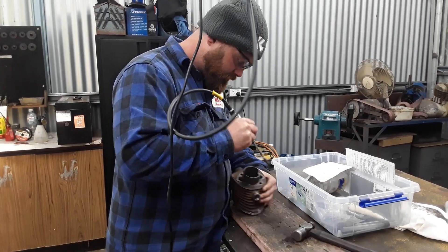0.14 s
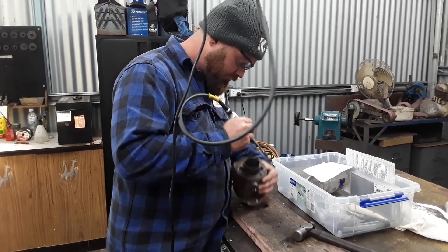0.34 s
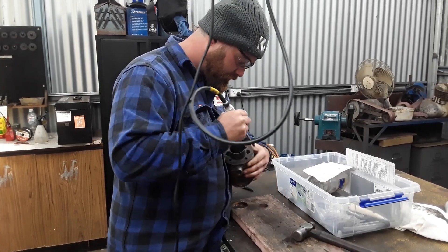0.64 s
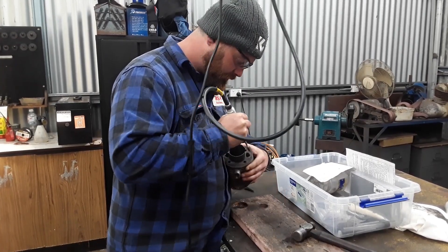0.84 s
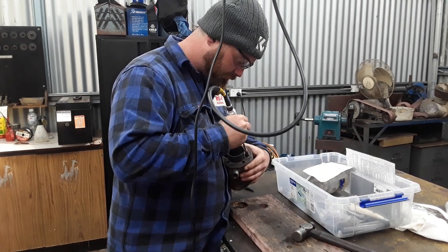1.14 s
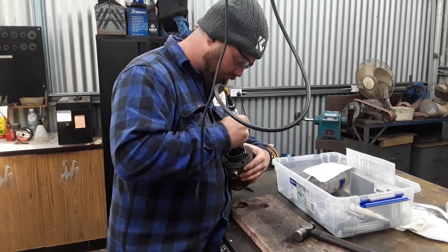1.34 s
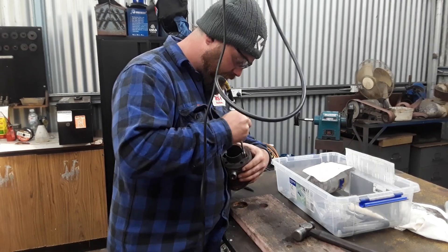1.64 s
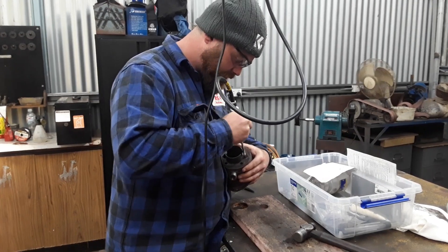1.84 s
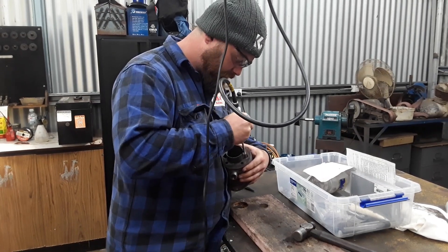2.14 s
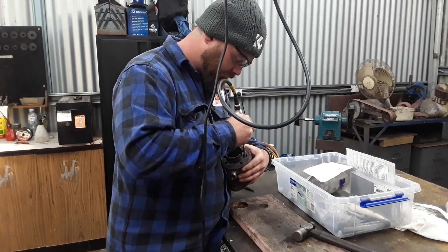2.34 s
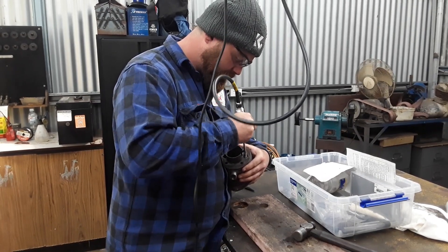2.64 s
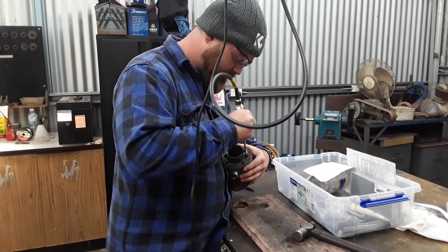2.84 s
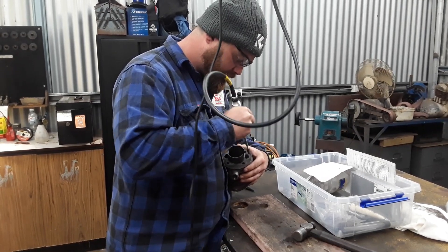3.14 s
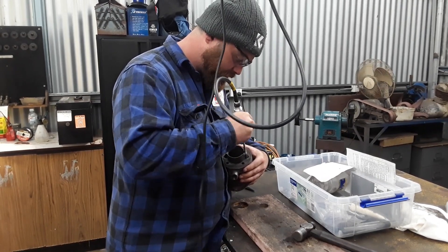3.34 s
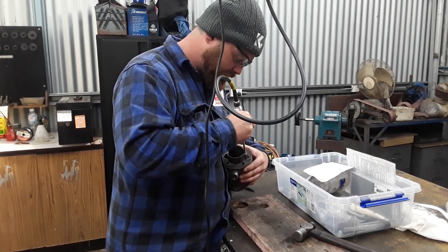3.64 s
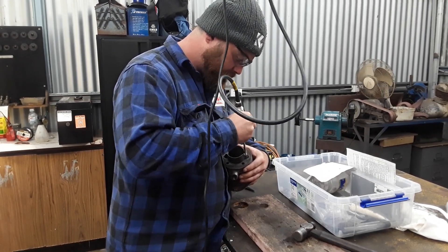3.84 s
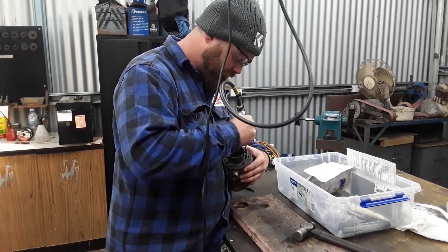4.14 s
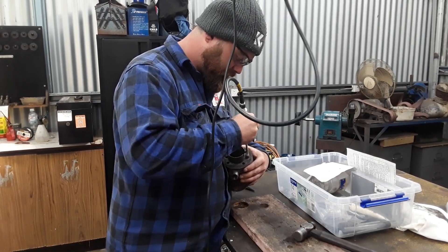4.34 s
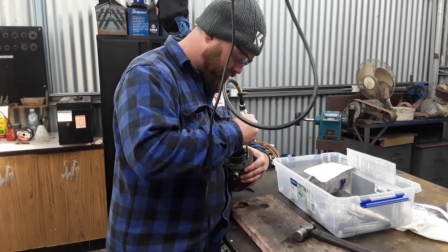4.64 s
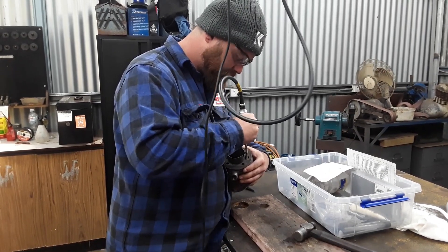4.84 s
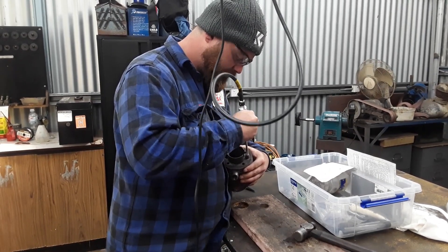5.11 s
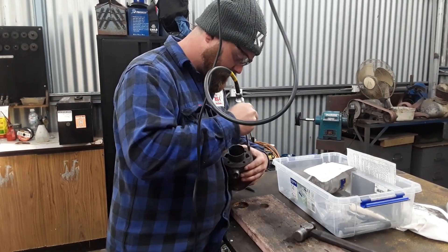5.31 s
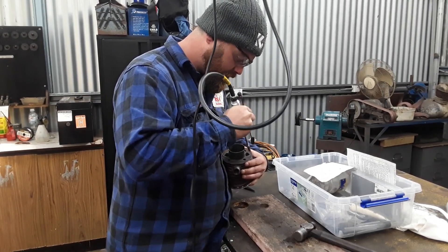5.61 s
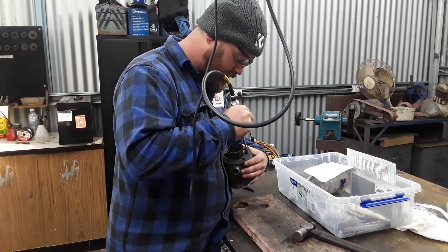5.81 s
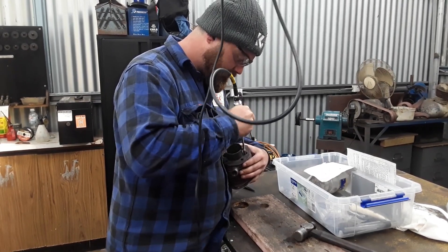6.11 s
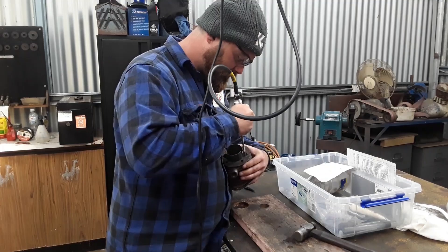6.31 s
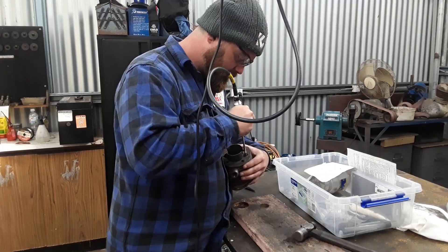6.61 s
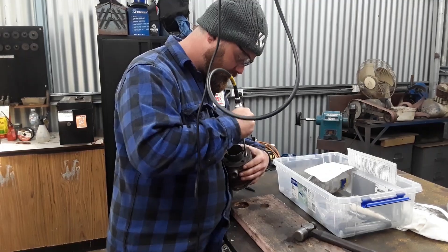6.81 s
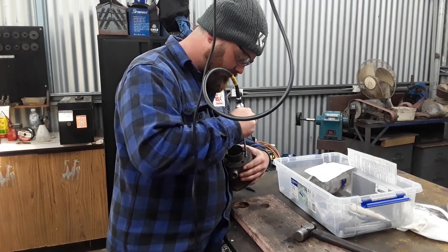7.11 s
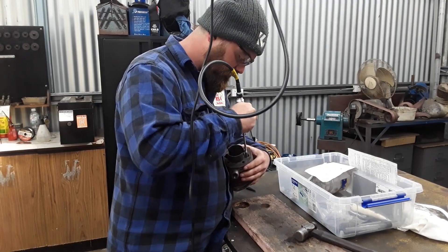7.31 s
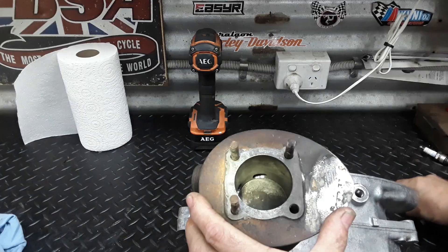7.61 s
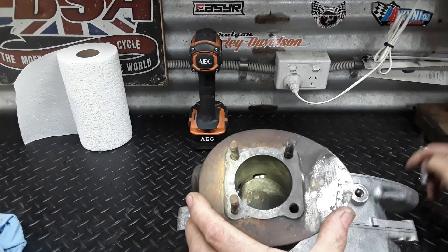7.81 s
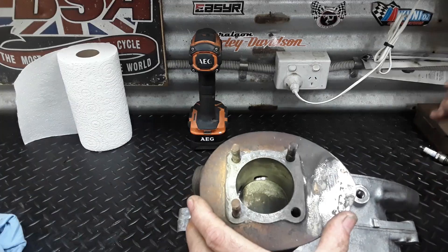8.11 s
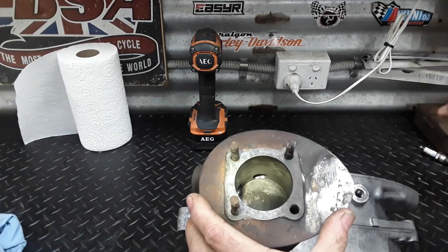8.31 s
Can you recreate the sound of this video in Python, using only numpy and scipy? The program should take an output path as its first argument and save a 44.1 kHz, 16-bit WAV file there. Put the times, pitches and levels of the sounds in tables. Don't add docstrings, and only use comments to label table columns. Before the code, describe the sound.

A die grinder whines freely, then cuts a metal casting in three hissing, ringing passes before an abrupt cut to a quiet bench with small knocks.

```python
import sys
import numpy as np
from scipy import signal
from scipy.fft import rfft, irfft, next_fast_len
from scipy.io import wavfile
from scipy.ndimage import uniform_filter1d

SR = 44100
rng = np.random.default_rng(int(sys.argv[2]) if len(sys.argv) > 2 else 0)


def voltage_ratio(level):
    return 10 ** (np.asarray(level, float) / 20)


def unload_wav(signal):
    wavfile.write(
        sys.argv[1],
        SR,
        np.round(np.clip(np.atleast_2d(signal).T, -1, 1) * 32767).astype(np.int16),
    )


N = 373086


def unit(x):
    return x / np.sqrt(np.mean(x ** 2) + 1e-20)


def curves(rows):
    s, *cols = np.transpose(rows)
    return [np.interp(np.arange(N) / SR, s, c) for c in cols]


def wobble(rate, size=1):
    knots = rng.standard_normal(int(N * rate / SR) + 4)
    return np.interp(np.arange(0, N, size) * rate / SR, np.arange(len(knots)), knots)


def filtered(x, response):
    m = next_fast_len(N + SR // 2)
    return irfft(rfft(x, m) * response(np.fft.rfftfreq(m, 1 / SR)), m)[:N]


def colour(points):
    hz, db = np.transpose(points)
    return lambda f: voltage_ratio(np.interp(np.log(f + 1), np.log(hz + 1), db))


def resonances(modes):
    def response(f):
        total = 0
        for k, (centre, width, db) in enumerate(modes):
            damping = 1j * f * width
            total = total + (-1) ** k * voltage_ratio(db) * damping / (centre * centre - f * f + damping)
        return total
    return response


def lifted(modes):
    return lambda f: np.sqrt(1 + np.abs(resonances(modes)(f)) ** 2)


def patchy(x, depth_db, span=8):
    z = signal.stft(x, nperseg=1024)[2]
    field = uniform_filter1d(rng.standard_normal(z.shape), size=8, axis=0)
    field = uniform_filter1d(field, size=span, axis=1)
    return signal.istft(z * voltage_ratio(depth_db * unit(field)), nperseg=1024)[1][:N]


def hum(lines, sway_db):
    t, out = np.arange(N) / SR, 0
    for hz, db in lines:
        level = voltage_ratio(db + sway_db * wobble(13))
        out = out + level * np.sin(2 * np.pi * hz * t + wobble(25))
    return out


# frequency in Hz, level in dB.
BENCH_AIR = [(15, -44), (25, -14), (33, -4), (123, -14), (161, -10), (185, -12), (242, -6), (301, -13.5),
             (2350, -35.5), (5730, -52), (8360, -25), (9840, -46), (16000, -45)]
# frequency in Hz, level in dB rms.
BENCH_HUM = [(97, -74), (156, -72)]
# start in seconds, peak in dB, stronger mode in Hz, weaker mode in Hz,
# t60 in seconds.
KNOCKS = [
    (8.008, -80, 6160, 2850, .1),
    (8.087, -43, 1390, 1870, 0.031),
    (8.29, -82, 6160, 6190, 0.26),
    (8.436, -44.5, 578, 1040, 0.096),
    (8.445, -53, 423, 902, .12),
    (8.453, -48, 600, 1107, .12),
]
# frequency in Hz, level in dB.
BENCH_TOP = [(300, -6), (1500, 6), (3500, -6), (5500, -12), (8300, -6), (10500, -24.5)]


def bench():
    out, t = np.zeros(N + SR), np.arange(SR // 4) / SR
    for s, db, low_hz, high_hz, t60 in KNOCKS:
        modes = np.sin(2 * np.pi * low_hz * t) + 0.65 * np.sin(2 * np.pi * high_hz * t)
        rattle = filtered(rng.standard_normal(N), colour(BENCH_TOP))[:len(t)]
        envelope = voltage_ratio(db - 11 - 60 * t / t60) * (1 - np.exp(-t / 0.00097))
        out[round(s * SR):][:len(t)] += envelope * (modes + 0.5 * rattle)
    air = patchy(filtered(rng.standard_normal(N), colour(BENCH_AIR)), depth_db=-2.5, span=2)
    return out[:N] + voltage_ratio(-67.5 + 1.2 * wobble(8)) * unit(air) + hum(BENCH_HUM, sway_db=1.5)


# frequency in Hz, level in dB rms.
SHED_HUM = [(102, -59), (221, -58.5)]


def shed_hum():
    return hum(SHED_HUM, sway_db=3.5)


def shed(x, t60):
    t, hop = np.arange(SR // 2) / SR, SR // 5
    wide, out = np.pad(x, (hop, 2 * hop)), np.zeros(N + 2 * SR)
    fade = np.sin(np.pi * np.arange(2 * hop) / (2 * hop))
    for at in range(0, N + hop, hop):
        tail = rng.standard_normal(len(t)) * voltage_ratio(-60 * t / t60)
        piece = wide[at:at + 2 * hop] * fade
        out[at:at + 2 * hop + len(t) - 1] += signal.fftconvolve(piece, tail / np.linalg.norm(tail))
    return out[hop:hop + N]


# time in seconds, speed in turns per second, whine in dB.
SHAFT = [(0, 206.8, -28), (1.12, 220.6, -28), (1.42, 223.7, -30), (1.72, 225.1, -26), (2.02, 224.1, -23.5),
         (2.9, 218.5, -29), (3.07, 220, -29.5), (3.37, 222.9, -28.5), (3.6, 224.2, -28.5),
         (4.12, 219.9, -27), (4.42, 218.6, -27.5), (4.95, 212.2, -29), (5.17, 213.2, -27.5),
         (5.47, 217.6, -30), (5.77, 220.4, -30), (6.12, 223.3, -26.5), (7.27, 214.8, -30),
         (7.56, 217.4, -29)]


def shaft():
    speed_hz, whine_db = curves(SHAFT)
    return np.cumsum(speed_hz) / SR, whine_db


# multiple of the shaft speed, level in dB.
WHINE = [(1, -26), (20, -23), (30, -13), (36, -5), (41, -7), (47, -13), (55, -20), (70, -24)]
LEADING = (3, 4, 5, 9, 12, 15, 16, 19, 22, 23, 24, 25, 28, 29, 31, 32, 35, 39, 42, 43, 44, 46, 58)
# level over the slope in dB, level won back while cutting in dB.
STANDS_OUT = [(6, 7), (2, 4), (7, 6), (9, 4), (17, 2), (6, 0), (13, 4), (14, -2), (17.5, -1), (7, 2),
              (10, 3), (4, 0), (-6, 0), (3, 0), (6, 0), (8, 0), (6, -2), (2, 1), (10, -6), (-10, 0),
              (5, -3), (3, -2), (5, -5)]
# frequency in Hz, width in Hz, level in dB.
VENTS = [(3720, 94, 1.7), (5234, 110, 4.6), (7850, 280, 5.3), (8570, 500, 3.3)]
# frequency in Hz, level in dB per Hz.
AIR = [(15, -57.5), (25, -32.5), (48, -34.5), (96, -23), (390, -15.5), (650, -11.5), (724, -15.5),
       (1060, -4), (1270, -13), (1960, -5.5), (3950, -10.5), (5760, -11), (8170, 0), (10700, -15),
       (15600, -19.5)]
# frequency in Hz, width in Hz, level in dB.
HOUSING = [(657, 25, -1.5), (959, 240, 0), (4820, 920, 0.5)]
AIR_DB, AIR_LOADED_DB = -26, 2.5
ORDER_SCATTER_DB, ORDERS_LOADED_DB = -1, -6
TREMBLE_TURNS, TREMBLE_LOADED = 0.0003, 7
SINK_S = 0.5


def motor(turns, whine_db, load):
    sink = round(SINK_S * SR)
    held = load * uniform_filter1d(load, size=sink, origin=sink // 2 - 1)
    shaken = turns + TREMBLE_TURNS * (1 + TREMBLE_LOADED * held) * wobble(60)
    lead, whine, every = dict(zip(LEADING, STANDS_OUT)), 0, np.arange(N)
    for k in range(1, WHINE[-1][0] + 1):
        over_db, loaded_db = lead.get(k, (ORDER_SCATTER_DB * rng.standard_normal(), 0))
        db = np.interp(k, *np.transpose(WHINE)) + over_db
        db = db + (ORDERS_LOADED_DB + loaded_db) * held[::256]
        db = db + 1.1 * wobble(4, size=256) + 2.3 * wobble(20, size=256)
        gain = np.interp(every, every[::256], voltage_ratio(db))
        whine = whine + gain * np.sin(2 * np.pi * (k * shaken + rng.random()))
    whine = filtered(whine, lifted(VENTS))
    noise = rng.standard_normal(N) * (1 + 0.033 * np.cos(2 * np.pi * turns))
    air = filtered(noise, lambda f: colour(AIR)(f) * lifted(HOUSING)(f))
    air_db = AIR_DB + AIR_LOADED_DB * load + 1.1 * wobble(3)
    return voltage_ratio(whine_db - 4.5) * whine + voltage_ratio(air_db) * unit(patchy(air, depth_db=1.28))


# time in seconds, pressure as hiss in dB, casting ring in relative dB.
BITE = [
    [(1.36, -32, -20), (1.44, -22, -7), (1.68, -21, -6.5), (1.79, -18.5, -18), (2.0, -18, -5.5),
     (2.24, -18.5, -9), (2.4, -16, -7), (2.86, -19, 0), (2.98, -26, -4)],
    [(3.33, -33, -27), (3.48, -18.5, -6.5), (3.9, -19, -10.5), (4.25, -18, -3), (4.45, -18, -3),
     (4.76, -14.5, -3.5), (5.02, -19.5, -1.5), (5.23, -23.5, -1.5), (5.33, -47, -17)],
    [(6.03, -25.5, -24), (6.3, -16.5, -10.5), (6.45, -22, -18.5), (6.62, -18.5, -6), (6.94, -16, -2),
     (7.06, -23, -5), (7.14, -15.5, -15), (7.4, -26, -24), (7.53, -19.5, -8)],
]
# level in dB, pass by pass.
KNOCK_DB = (-20, -30, -16)


def grip():
    rows = []
    for bites, knock in zip(BITE, KNOCK_DB):
        cut = [(s, db, ring, knock) for s, db, ring in bites]
        touch = (cut[0][0] - 0.04, -70, *cut[0][2:])
        lift = (cut[-1][0] + 0.06, -70, *cut[-1][2:])
        rows += [touch, *cut, lift]
    return curves(rows)


# centre in seconds, length in seconds, frequency in Hz, level in dB rms.
SING = [(1.483, 0.098, 1970, -32.5), (1.919, .19, 2250, -32.5), (2.02, .12, 1432, -33.5),
        (2.06, 0.17, 2002, -34), (2.192, .48, 1790, -41), (2.337, .16, 1563, -36.5),
        (2.405, .15, 1319, -32.5), (2.42, .22, 1985, -27.5), (3.74, .18, 3570, -37),
        (4.285, 0.12, 2420, -38), (4.42, 0.42, 3433, -36), (4.599, .12, 1760, -29),
        (4.647, 0.21, 1545, -31), (4.659, .15, 1428, -40), (4.662, .36, 2153, -42), (4.784, .16, 2090, -35),
        (4.8, .1, 3710, -29.5), (4.784, 0.061, 1935, -24.5), (4.789, 0.12, 1740, -34.5),
        (4.818, 0.045, 4700, -34.5), (5.115, .22, 1993, -32.5), (6.257, 0.2, 1380, -36.5),
        (6.284, .25, 3000, -38), (6.285, 0.11, 1826, -33), (6.623, 0.11, 1410, -32.5),
        (6.66, .15, 2875, -36), (6.668, 0.13, 1643, -34), (6.907, 0.67, 1612, -40),
        (1.85, .35, 673, -38), (2.2, 0.27, 677, -42.5), (2.429, .12, 654, -34), (2.595, .2, 664, -40.5),
         (2.76, 0.3, 674, -39.5), (6.285, 0.27, 657, -38.5), (6.619, 0.26, 695, -47),
         (6.897, .3, 698, -40.5), (7.203, .3, 690.6, -43.5), (7.44, 0.25, 674, -41.5),
         (1.6, .3, 4945, -34.5), (3.22, .12, 4210, -39), (3.489, .2, 4915, -32), (3.58, 0.21, 5340, -32),
         (2.35, .9, 222, -53.5), (3.7, 0.59, 281, -59.5)]
# frequency in Hz, level in dB rms at full pressure.
HELD = [
    (3550, -43.5),
    (669, -50.5),
]


def chatter(load):
    out = np.zeros(N + SR)
    for s, length, hz, db in SING:
        t = np.arange(round(1.7 * length * SR)) / SR
        drift = np.interp(t, np.linspace(0, t[-1], 12), rng.standard_normal(12))
        tone = np.sin(2 * np.pi * hz * t + 1.1 * drift) * np.hanning(len(t))
        out[round(s * SR) - len(t) // 2:][:len(t)] += voltage_ratio(db + 3.5) * tone
    return out[:N] + load * hum(HELD, sway_db=3)


# frequency in Hz, level in dB per Hz.
CHIPS = [(150, -61), (250, -42), (508, -23.5), (682, -10), (825, -40.5), (980, -40), (1230, -13),
         (1990, -10), (2540, -11), (5920, -11.5), (7810, -2), (11400, -16), (15600, -51.5)]
# frequency in Hz, width in Hz, level in dB.
HISS_PEAKS = [(7680, 190, 0.84), (8100, 810, 2.93)]
# frequency in Hz, width in Hz, level in dB.
CASTING = [(1329, 80, -5), (1476, 90, -1.5), (1712, 120, 0.5), (1963, 140, 3), (2240, 220, -4.5),
           (3568, 96, -2), (4600, 580, -6.5)]
# frequency in Hz, width in Hz, level in dB.
BORE = [(593, 49, -9), (688, 35, -1)]
# frequency in Hz, width in Hz, level in dB.
SQUEAL = [(13980, 2600, 0)]
# centre in seconds, length in seconds, rise in dB.
SQUEALS = [(1.68, .15, 5), (2.37, 0.14, 7), (2.74, .15, 8), (3.699, .2, 4), (4.15, 0.19, 11),
           (4.958, .1, 9), (6.44, .15, 7.5), (7.072, .08, 7.5), (7.25, 0.22, 6), (7.421, .2, 9.5)]
SQUEAL_DB = -19.5


def burr(turns, hiss_db, ring_db, knock_db):
    t, squeal_db = np.arange(N) / SR, SQUEAL_DB
    for s, length, db in SQUEALS:
        squeal_db = squeal_db + db * np.exp(-(2 * (t - s) / length) ** 2)
    hiss_db, knock_db = hiss_db + 0.8 * wobble(9), knock_db + 4 * wobble(7)
    turn = np.arange(1, int(turns[-1]))
    timing_luck, force_luck = rng.standard_normal((2, len(turn)))
    at = np.searchsorted(turns, turn + 0.033 * timing_luck).clip(0, N - 1)
    force = (1 + 0.17 * (-1) ** turn) * voltage_ratio(2.5 * force_luck)
    blows = unit(np.bincount(at, force, N))

    def grit():
        rough = rng.standard_normal(N) * voltage_ratio(2.1 * wobble(500) + 2.8 * wobble(25))
        return unit(rough * (1 + 0.28 * np.cos(2 * np.pi * turns)))

    hiss = filtered(grit(), lambda f: colour(CHIPS)(f) * lifted(HISS_PEAKS)(f))
    ring = filtered(blows + 0.71 * grit(), resonances(CASTING))
    knock = filtered(blows + 0.6 * grit(), lambda f: resonances(BORE)(f) ** 2)
    squeal = filtered(grit(), lambda f: resonances(SQUEAL)(f) ** 2)
    parts = unit(patchy(hiss, depth_db=2.0))
    parts = parts + voltage_ratio(ring_db - 5.0) * unit(patchy(ring, depth_db=2.0))
    parts = parts + voltage_ratio(knock_db - 11.5) * unit(patchy(knock, depth_db=1.5))
    parts = parts + voltage_ratio(squeal_db + 1.0) * unit(patchy(squeal, depth_db=1))
    return voltage_ratio(hiss_db - 1.0) * parts


# time in seconds, gain in dB.
SHED_CUT = [
    (0, -0.5),
    (7.515, 0.5),
    (7.518, -19),
    (7.543, -40),
    (7.552, -120),
    (8.46, -120),
]
# time in seconds, gain in dB.
BENCH_CUT = [
    (0, -120),
    (7.59, -120),
    (7.605, -15.5),
    (7.63, 1),
    (8.1, 0),
    (8.22, 0.5),
    (8.33, 3),
    (8.46, 6.5),
]
CUTTING_DB, BITE_RANGE_DB = -19.5, 11.5


def scene():
    (turns, whine_db), hand = shaft(), grip()
    load = np.clip(0.5 + (hand[0] - CUTTING_DB) / BITE_RANGE_DB, 0, 1)
    tool = motor(turns, whine_db, load) + burr(turns, *hand)
    work = voltage_ratio(-1) * tool + voltage_ratio(-7.5) * shed(tool, t60=0.37) + chatter(load) + shed_hum()
    work = work - 0.00055
    mono = voltage_ratio(curves(SHED_CUT)[0]) * work + voltage_ratio(curves(BENCH_CUT)[0]) * bench()
    return np.array([mono, mono])


# centre in seconds, share of lines kept.
STARVED = [(1.362, 0.032), (2.023, 0.042), (2.407, .02), (2.428, .02), (4.242, 0.066), (4.284, 0.02),
           (4.54, .04), (4.647, 0.02), (4.818, 0.024), (4.839, 0.019), (4.86, 0.0072), (5.244, .04),
           (6.652, .04), (7.122, 0.029), (7.207, 0.048)]
HOP, GRID = 941, 722


def starve(x):
    n, k = np.arange(2 * HOP), np.arange(HOP)[:, None]
    window = np.sin(np.pi * (n + 0.5) / (2 * HOP))
    basis = np.sqrt(2 / HOP) * window * np.cos(np.pi / HOP * (n + 0.5 + HOP / 2) * (k + 0.5))
    out = x.copy()
    for s, share in STARVED:
        start = GRID + HOP * (round((s * SR - GRID) / HOP) - 1)
        lines = basis @ x[start:start + 2 * HOP]
        least = np.quantile(np.abs(lines), 1 - np.clip(share, 0.004, 1))
        kept = np.sign(lines) * (np.abs(lines) >= least)
        kept = 0.84 * kept * np.linalg.norm(lines) / np.linalg.norm(kept)
        out[start:start + 2 * HOP] += (kept - lines) @ basis
    return out


# centre in seconds, low edge in Hz, high edge in Hz, level in dB.
FILLED = [(.163, 4160, 5120, -43), (2.163, 13400, 15280, -45), (3.045, 4200, 5180, -41.5),
          (3.625, 11700, 13160, -40), (6.69, 5600, 7000, -36), (6.69, 8200, 9750, -28)]


def side_noise():
    t, side = np.arange(N) / SR, np.zeros(N)
    for s, low_hz, high_hz, db in FILLED:
        band = filtered(rng.standard_normal(N), lambda f: (f > low_hz) & (f < high_hz))
        side = side + voltage_ratio(db) * unit(band) * np.cos(np.pi * np.clip((t - s) / 0.046, -0.5, 0.5))
    return side


def top_cut(x):
    return signal.sosfilt(signal.butter(12, 16390, fs=SR, output="sos"), x)


def record(dry):
    side = side_noise()
    soft = dry[0] / (1 + np.abs(dry[0] / 0.85) ** 4) ** (1 / 4)
    mono = filtered(starve(soft), lambda f: np.clip((15750 - f) / 40, 0, 1) ** 2)
    return top_cut(np.array([mono + side, mono - side]))


dry = scene()
out = record(dry)
unload_wav(out)
```